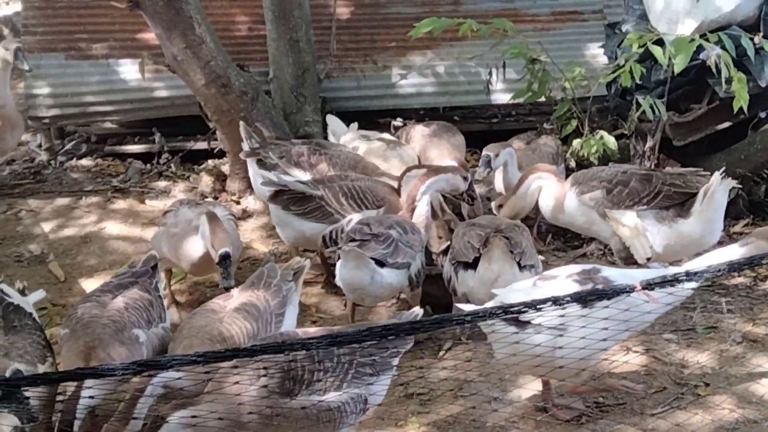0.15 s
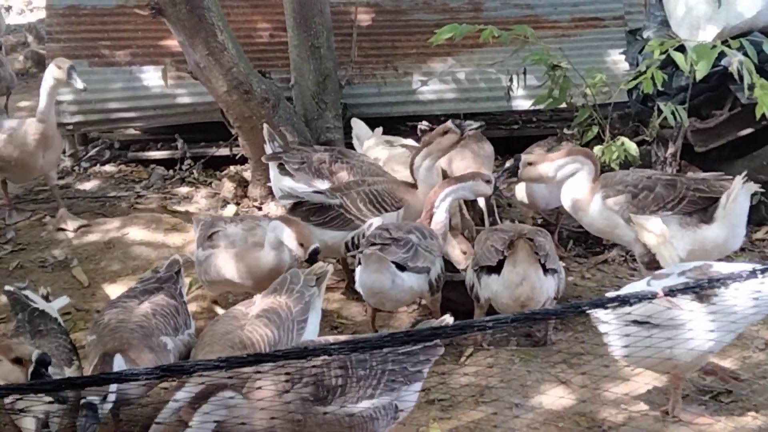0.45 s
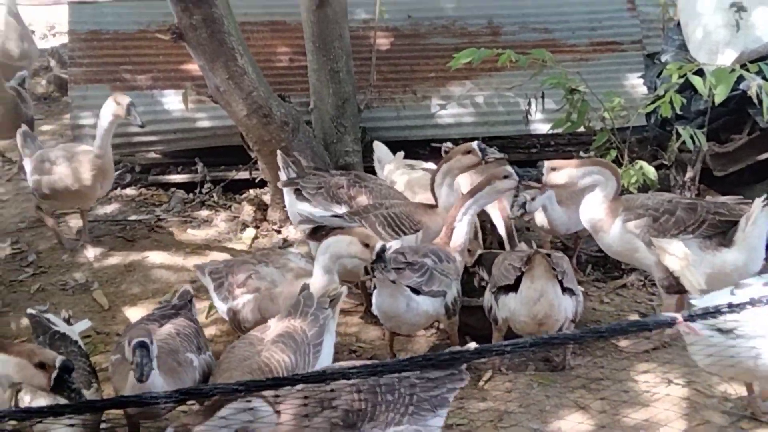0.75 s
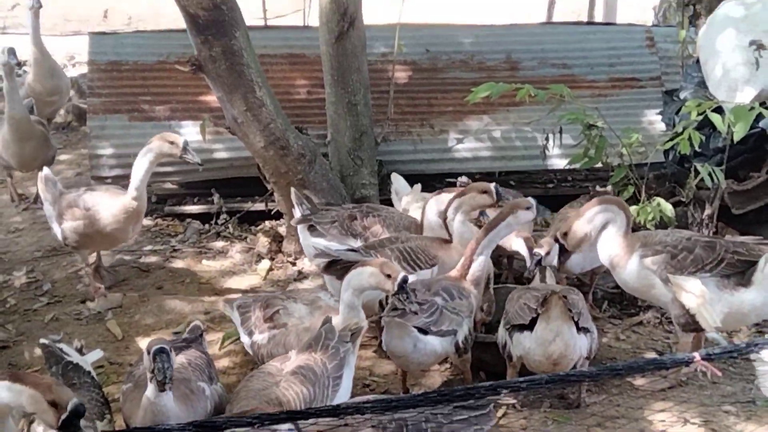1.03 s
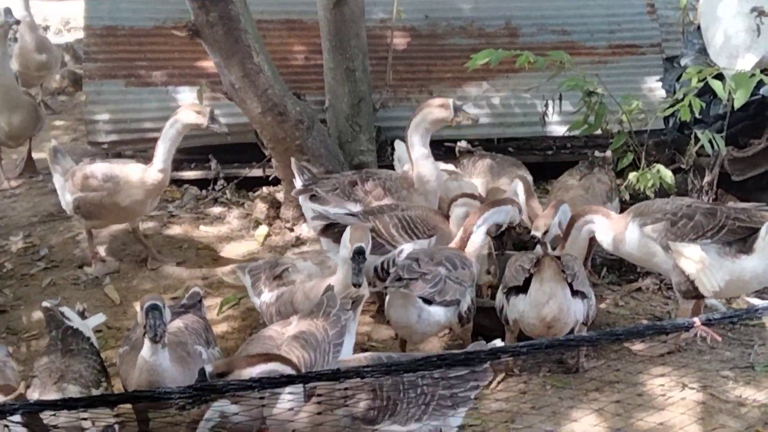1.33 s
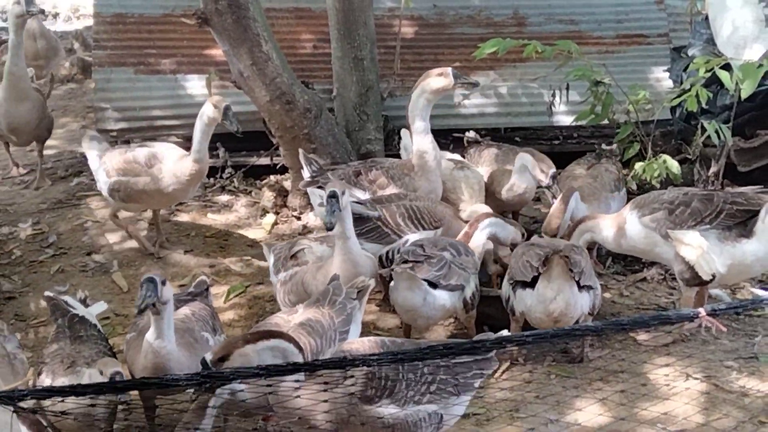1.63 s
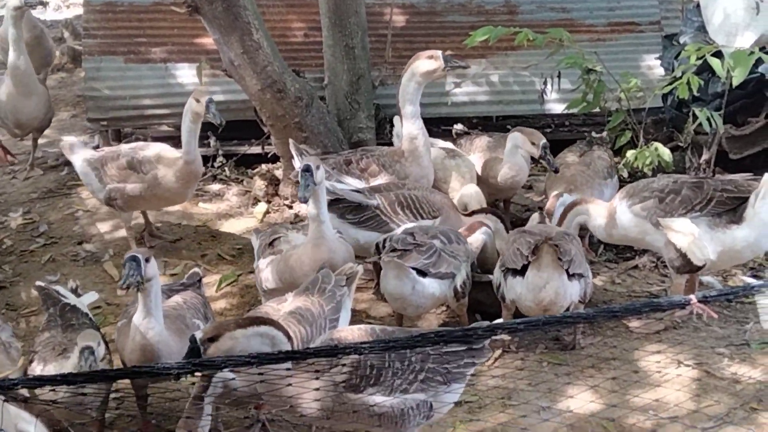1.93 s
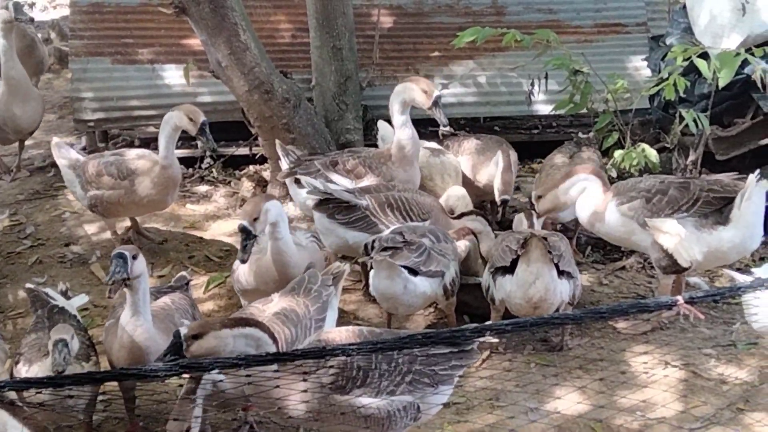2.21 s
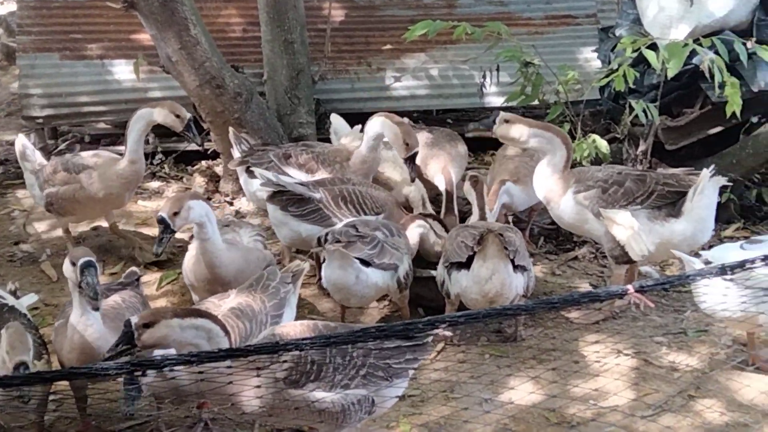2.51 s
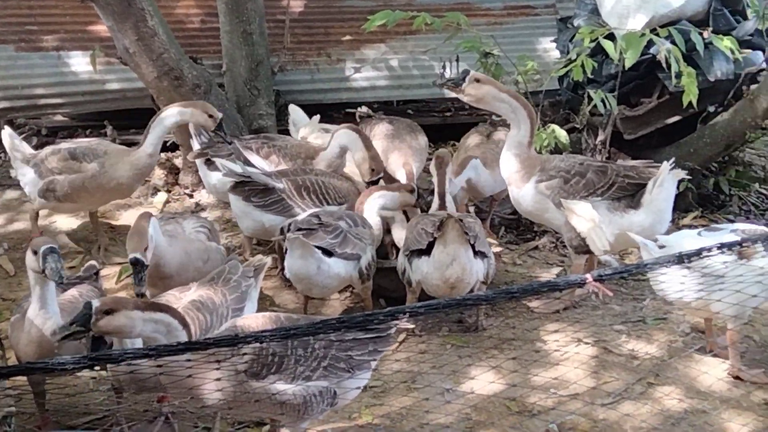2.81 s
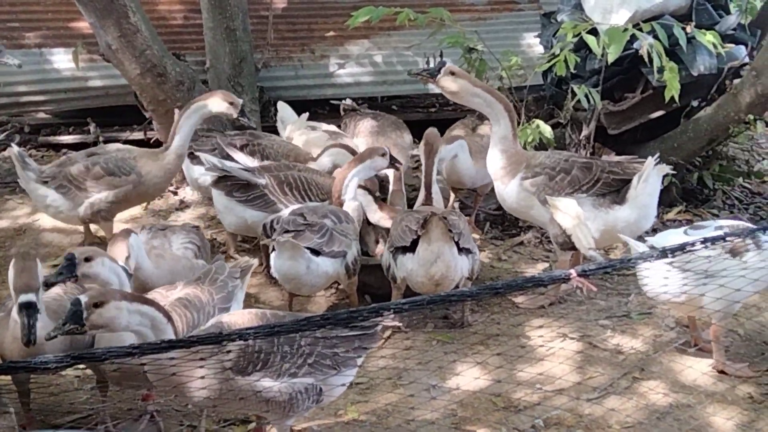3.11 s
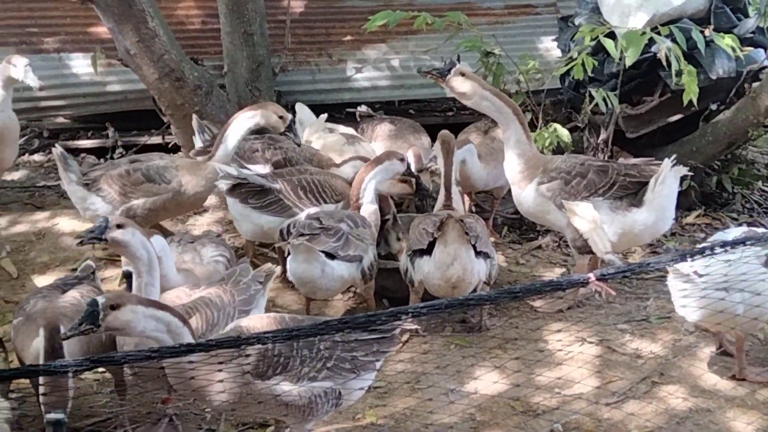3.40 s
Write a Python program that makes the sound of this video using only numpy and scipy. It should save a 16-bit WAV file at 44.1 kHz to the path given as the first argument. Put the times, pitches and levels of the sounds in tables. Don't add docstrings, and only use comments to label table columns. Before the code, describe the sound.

Geese honk in short nasal calls, one after another, over cicada hiss and a low engine drone.

```python
import sys
import numpy as np
from scipy import signal
from scipy.io import wavfile
from scipy.ndimage import uniform_filter1d

SR = 44100
rng = np.random.default_rng(int(sys.argv[2]) if len(sys.argv) > 2 else 0)


def persist_wave(psi):
    counts = np.round(np.clip(psi, -1, 1) * 32767).astype(np.int16)
    wavfile.write(sys.argv[1], SR, np.atleast_2d(counts).T)


def decibels_to_gain(level_db):
    exponent = np.asarray(level_db, float) / 20
    return 10 ** exponent


N = 156555

# centre_hz, width_hz, level_db
CICADA_LEVEL = [(0, -61.5), (.7, -60.5), (1.55, -61.5), (1.9, -68), (2.7, -76.5), (3.05, -64.5),
                (3.55, -61.5)]
CICADA_BANDS = [(8420, 700, 26), (7350, 1900, -39), (10300, 2000, -35.5)]
# start_s, level_db
ENGINE_LEVEL = [(0, -58.5), (1.45, -59), (1.8, -63), (3.55, -64.5)]
# frequency_hz, density_db (per Hz)
RUMBLE_SPECTRUM = [(20, 1.5), (100, -6), (200, -11), (300, -33.5), (450, -19)]
ENGINE_ORDERS = [-14.5, -6, -5.5]
# frequency_hz, density_db (per Hz)
AIR_SPECTRUM = [(250, -36), (500, -9.5), (6000, -16.5), (9000, -15.5), (15500, -10.5)]
# start_s, pitch_hz, level_db
BIRD_GLIDES = [
    [(0, 2284, -67), (.11, 2140, -74)],
    [(1.0, 2423, -68), (1.08, 2094, -69.5), (1.135, 1505, -66)],
    [(1.09, 3090, -72), (1.125, 3600, -72), (1.155, 2840, -69)],
    [(1.625, 1330, -61), (1.67, 2263, -68), (1.76, 2200, -70.5), (1.84, 1840, -62), (1.89, 1490, -95)],
    [(1.725, 5400, -88), (1.76, 4400, -84), (1.83, 4050, -83)],
    [(2.13, 4600, -77), (2.175, 4230, -60), (2.195, 3560, -67), (2.23, 2680, -73)],
    [(3.44, 1978, -59), (3.5, 1889, -65.5), (3.525, 1940, -86)],
    [(3.515, 4880, -67), (3.535, 3500, -72), (3.55, 2800, -42.5)],
]
# start_s,
# length_s, low_hz, high_hz, level_db
SHUFFLES = [(.0, .14, 1840, 5260, -68.5), (.135, .027, 202, 680, -58), (.28, .2, 800, 2600, -67),
            (.68, .22, 900, 5000, -71), (1.19, .27, 8000, 15600, -63), (1.3, .16, 500, 5000, -65),
            (1.44, .057, 382, 480, -74), (1.655, .035, 394, 687, -73.5), (2.48, .5, 9500, 15600, -71),
            (.27, .12, 530, 600, -74), (0, .09, 550, 950, -70), (3.5, .05, 9000, 15600, -67),
            (1.15, .025, 600, 2500, -71), (2.2, .13, 2800, 4400, -74), (2.42, .06, 550, 800, -73),
            (2.93, .08, 400, 1800, -72)]
# start_s, level_db, pulse_rate_hz
HONK_1 = [(.115, -60, 134), (.14, -52.5, 135.5), (.17, -47.5, 139), (.206, -43, 141.3), (.255, -45, 140.6),
          (.272, -50.5, 138.2), (.3, -58.5, 141)]
HONK_2 = [(.49, -58, 126.2), (.502, -47, 134.9), (.54, -43.5, 154.6), (0.58, -41, 176.3),
          (0.635, -45, 185.3), (0.654, -58, 186.3), (.69, -70, 189)]
HONK_3 = [(0.894, -63, 145.8), (0.91, -51.5, 149.6), (0.938, -50, 151.8), (0.986, -51, 182.3),
          (1.032, -64.5, 189)]
HONK_4 = [(1.203, -55.5, 149.7), (1.225, -53, 150.6), (1.24, -45.5, 151.6), (1.267, -50, 149.5),
          (1.33, -47, 151.8), (1.356, -47, 152), (1.377, -58.5, 147.6), (1.401, -57, 145)]
HONK_5 = [(2.425, -76.5, 156.1), (2.464, -65.5, 159.4), (2.521, -56.5, 173.6), (2.602, -51, 173.3),
          (2.721, -53.5, 178.7), (2.86, -66, 169.7)]
HONK_5_UPPER = [(2.5, -68, 284.5), (2.531, -55.5, 287), (2.6, -53, 290), (2.672, -48.5, 296.4),
                (2.72, -50.5, 298.6), (2.79, -48.5, 303.4), (2.922, -52, 296.8), (2.975, -68.5, 290)]
HONK_6 = [(3.222, -59.5, 151.6), (3.241, -51, 156.5), (3.278, -48, 163.7), (3.309, -47.5, 166.1),
          (3.369, -44.5, 169.1), (3.407, -44.5, 170.5), (3.433, -49.5, 166.6), (3.456, -63.5, 163.8),
          (3.48, -66, 162)]
VOICES = [(.9, .13, .002, .45, .3), (.5, .65, .025, 1, .8), (.7, .65, .02, 1, .6), (.7, .3, .002, 1, 0),
          (.7, .45, .008, 1, 0), (.5, .58, .012, 1, 0), (.6, .2, .003, 1, .85)]
# chest_db, hiss_db (against the voice), pipe_spacing_hz, closed_beak_hz
CHEST_AND_PIPE = [(-13, -53, 632, 1440), (-13, -11.5, 590, 790), (0, -13.5, 640, 825),
                  (-13, -19, 560, 1550), (-24.5, -18, 540, 1460), (-52, -50, 640, 900),
                  (-19, -18, 535, 975)]
# opening_s, closed_resonance_db, throat_while_closed_db
BEAKS = [(0.081, 6.5, -3.5), (0.037, 10.5, 0.5), (0.033, 10, -6), (0.018, -4.5, -12), (0.037, 16, 4),
         (0.092, 8.5, -6.5), (0.066, 19.5, -3)]
# centre_hz, width_hz, level_db
THROATS = [
    [(463, 130, -5.5), (890, 250, -2), (1160, 180, -0.5), (1460, 360, -0.5), (1690, 150, -5.5),
     (1960, 123, 6), (3880, 860, -14)],
    [(560, 210, -6), (970, 400, -2.5), (1230, 114, 7.5), (1490, 176, 8), (1960, 390, -6.5),
     (3620, 700, -5.5), (5250, 680, -19)],
    [(560, 220, 0), (836, 370, -1), (1227, 240, 5.5), (1600, 490, 2), (2200, 210, -16), (3580, 260, -4)],
    [(510, 390, -18.5), (957, 126, -1), (1030, 126, 4), (1470, 300, -10), (1980, 410, -9.5),
     (2623, 90, -9.5), (2890, 69, -6.5), (3600, 180, -8.5)],
    [(508, 60, 1.5), (877, 120, 5.5), (1050, 140, 1), (1377, 100, -0.5), (1624, 120, -5), (2060, 380, -7),
     (2950, 2300, -16.5)],
    [(928, 190, 1), (1120, 174, 0.5), (1380, 132, -0.5), (1656, 121, 4), (2000, 100, -11.5),
     (2470, 160, -6.5), (3165, 135, -16.5), (3720, 340, -6), (4820, 2700, -24)],
    [(522, 46, -4), (1076, 215, 4.5), (1390, 340, -4), (2130, 100, -3), (2470, 110, -6), (3130, 200, -5),
     (3680, 320, -7.5), (4160, 180, -9), (5080, 900, -22.5)],
]
# delay_s, level_db
WALL_ECHOES = [(0.012, -11.5)]
# start_s, peak_db
TICKS = [(.177, -50), (.674, -57), (.857, -60), (1.157, -53), (1.232, -52), (3.521, -53)]


def rms_one(x):
    return x / np.sqrt(np.mean(x ** 2) + 1e-20)


def in_time(rows):
    s, *columns = np.transpose(rows)
    at = np.arange(int(max(s[0], 0) * SR), min(int(s[-1] * SR), N))
    return at[0], [np.interp(at / SR, s, column) for column in columns]


def whole_gain(rows):
    return decibels_to_gain(np.interp(np.arange(N) / SR, *np.transpose(rows)))


def edge_fade(size, ramp):
    n = np.arange(size)
    return np.minimum(np.minimum(n, n[::-1]) / ramp, 1)


def drift(rate_hz, size=N):
    r = np.exp(-2 * np.pi * rate_hz / SR)
    noise = rng.standard_normal(size + SR)
    return rms_one(signal.lfilter([1], [1, -2 * r, r * r], noise)[SR:])


def resonances(x, rows):
    out = 0
    for k, (hz, width_hz, db) in enumerate(rows):
        r = np.exp(-np.pi * width_hz / SR)
        zeros = [(1 - r * r) / 2, 0, (r * r - 1) / 2]
        poles = [1, -2 * r * np.cos(2 * np.pi * hz / SR), r * r]
        out = out + (-1) ** k * decibels_to_gain(db) * signal.lfilter(zeros, poles, x)
    return out


def cut(x, hz, kind, order=2):
    return signal.sosfilt(signal.butter(order, hz, kind, fs=SR, output="sos"), x)


def coloured(spectrum, patchy_db):
    hz, db = np.transpose(spectrum)
    white = rng.standard_normal((2, N + SR // 2))
    edges = np.geomspace(hz[0], hz[-1], int(2 * np.log2(hz[-1] / hz[0])) + 2)
    out = 0
    for k, (low, high) in enumerate(zip(edges, edges[1:])):
        level = np.interp(np.log(low * high) / 2, np.log(hz), db)
        band = cut(white[k % 2], [low, high], "band")[SR // 2:]
        out = out + decibels_to_gain(level + patchy_db * drift(4.07)) * band
    return rms_one(out)


def tail(x, t60_s):
    t = np.arange(SR // 2) / SR
    shape = cut(rng.standard_normal(len(t)), 3300, "low") * decibels_to_gain(-60 * t / t60_s)
    shape = shape * (t > .012)
    return signal.fftconvolve(x, shape / np.sqrt(np.sum(shape ** 2)))[:N]


def cicadas():
    broad = resonances(rng.standard_normal(N), [(8100, 7100, 0)])
    chorus = rms_one(resonances(broad, CICADA_BANDS))
    throb_db = 1.3 * drift(79) + 0.28 * drift(8.7) - 3.5
    return whole_gain(CICADA_LEVEL) * decibels_to_gain(throb_db) * chorus


def engine():
    rotation_hz = 27.8 * (1 + 0.0075 * drift(1.44))
    phase = 2 * np.pi * np.cumsum(rotation_hz) / SR
    tones = 0
    for order, db in enumerate(ENGINE_ORDERS, 1):
        tones = tones + decibels_to_gain(db + 2 * drift(1.3)) * np.sin(order * phase)
    return whole_gain(ENGINE_LEVEL) * (coloured(RUMBLE_SPECTRUM, patchy_db=4.0) + tones)


def air():
    return decibels_to_gain(-68 - 6) * coloured(AIR_SPECTRUM, patchy_db=3.1)


def birds():
    out = np.zeros(N)
    for rows in BIRD_GLIDES:
        start, (hz, db) = in_time(rows)
        size = len(hz)
        hz = uniform_filter1d(hz, size=600, mode="nearest") * (1 + 0.0357 * drift(81.0, size))
        whistle = np.sin(2 * np.pi * np.cumsum(hz) / SR)
        burr = 1 + .5 * drift(260, size)
        out[start:start + size] += decibels_to_gain(db) * edge_fade(size, 300) * burr * whistle
    return out + decibels_to_gain(-11) * tail(out, t60_s=.22)


def shuffles():
    out = np.zeros(N)
    for s, length_s, low_hz, high_hz, db in SHUFFLES:
        start, size = int(s * SR), int(length_s * SR)
        puff = rms_one(cut(rng.standard_normal(size), [low_hz, high_hz], "band"))
        lumps = decibels_to_gain(db + 1.5 * drift(60, size))
        out[start:start + size] += puff * lumps * np.hanning(size) ** .5
    return out


def vocal_source(hz, phase, voice, pipe_hz):
    onset, settled, _, weak, _ = voice
    size = len(hz)
    settle_s, shimmer_db, spread_rad = .1, 2, 1.35
    rough = settled + (onset - settled) * np.exp(-np.arange(size) / SR / settle_s)
    shifts = spread_rad * rng.standard_normal(size=100)
    pulses = 0
    for k in range(2, min(int(SR / 4 / hz.max()), len(shifts))):
        pulses = pulses + weak ** (k % 2) * np.cos(k * phase + shifts[k])
    pulses = rms_one(pulses)
    gate = (.5 + .5 * np.cos(phase - 1)) ** 2
    noise = rms_one((.22 + gate) * rng.standard_normal(size))
    noise = noise - decibels_to_gain(-12) * cut(noise, 1500, "low", order=1)
    source = np.sqrt(1 - rough) * pulses * decibels_to_gain(shimmer_db * drift(70, size)) + np.sqrt(rough) * noise
    loop = np.r_[1, np.zeros(int(SR / pipe_hz) - 1), -.25]
    reflected = signal.lfilter([1], loop, source) - source
    return source + cut(reflected, 2470, "high")


def vocal_tract(source, swing_db, throat, beak, closed_hz):
    opens_s, closed_db, held_db = beak
    size = len(source)
    body = 0
    for k, (hz, width_hz, db) in enumerate(throat):
        broad = resonances(source, [(hz, 2 * width_hz, 0)])
        formant = resonances(broad, [(hz, width_hz, db)])
        wander = decibels_to_gain(3 * drift(14, size))
        body = body + (-1) ** k * formant * wander
    shut = np.exp(-(np.arange(size) / SR / opens_s) ** 4)
    closed = resonances(source, [(closed_hz, 90, 0)])
    body = decibels_to_gain(held_db * shut) * body + decibels_to_gain(closed_db) * shut * closed
    body = cut(body + decibels_to_gain(-20) * source, [380, 10500], "band", order=4)
    brighten = .4
    body = body + (decibels_to_gain(brighten * swing_db) - 1) * cut(body, 2370, "high")
    return body / np.sqrt(uniform_filter1d(body ** 2, size=1400) + 1e-20)


def honk(rows, voice, chest_and_pipe, beak, throat):
    start, (db, hz) = in_time(rows)
    wobble, gap = voice[2], voice[4]
    chest_db, hiss_db, pipe_hz, closed_hz = chest_and_pipe
    size, swing_db = len(hz), db - db.max()
    phase = 2 * np.pi * np.cumsum(hz * (1 + wobble * drift(40.5, size))) / SR
    source = vocal_source(hz, phase, voice, pipe_hz)
    body = vocal_tract(source, swing_db, throat, beak, closed_hz)
    hiss = rms_one(cut(source, [4500, 8800], "band"))
    chest = np.cos(phase) + 0.33 * np.cos(2 * phase)
    chest = chest * np.minimum(np.arange(size) / SR / 0.047, 1)
    call = body + decibels_to_gain(min(chest_db, -5)) * chest + decibels_to_gain(hiss_db + .5 * swing_db) * hiss
    call = decibels_to_gain(db) * call
    for width_hz in (1200, 500):
        call = call - gap * resonances(call, [(6360, width_hz, 0)])
    out = np.zeros(N)
    out[start:start + size] = edge_fade(size, 60) * call
    return out


def geese():
    calls = [HONK_1, HONK_2, HONK_3, HONK_4, HONK_5, HONK_5_UPPER, HONK_6]
    direct = sum(honk(*call) for call in zip(calls, VOICES, CHEST_AND_PIPE, BEAKS, THROATS))
    echoes = 0
    for delay_s, db in WALL_ECHOES:
        echoes = echoes + decibels_to_gain(db) * np.pad(direct, (int(delay_s * SR), 0))[:N]
    return direct + cut(echoes, 3100, "low") + decibels_to_gain(-25) * tail(direct, t60_s=.4)


def ticks():
    out, t = np.zeros(N + SR), np.arange(2000) / SR
    for s, db in TICKS:
        start = int(s * SR)
        burst = rng.standard_normal(len(t)) * decibels_to_gain(db - 60 * t / .015)
        bright = cut(burst, 8200, "high")
        dull = cut(burst, [600, 6000], "band")
        out[start:start + len(t)] += bright + decibels_to_gain(3.5) * dull
    return out[:N]


def scene():
    return (cicadas() + engine() + air() + birds() + shuffles() + geese() + ticks())[None]


def top_cut(x):
    return signal.sosfilt(signal.butter(12, 15640, fs=SR, output="sos"), x)


def record(dry):
    offset = -0.011 * np.exp(-np.arange(N) / SR / 0.54)
    return top_cut(dry + offset)


dry = scene()
out = record(dry)
persist_wave(out)
```